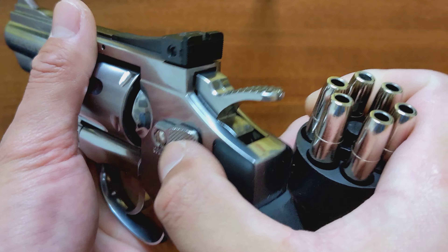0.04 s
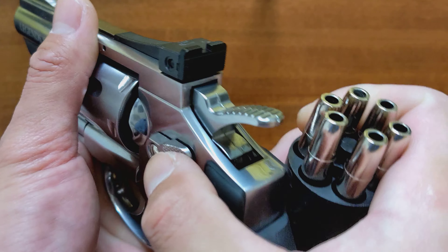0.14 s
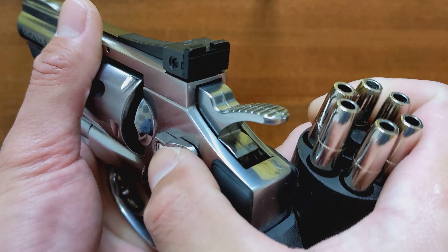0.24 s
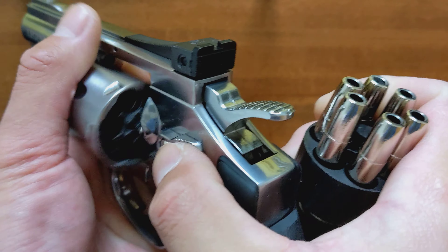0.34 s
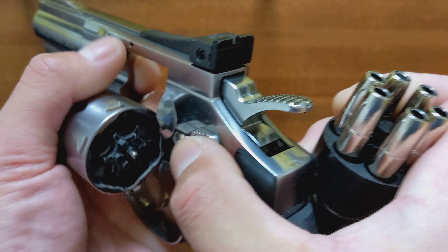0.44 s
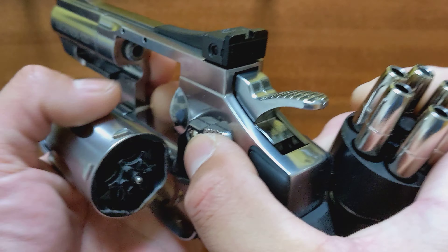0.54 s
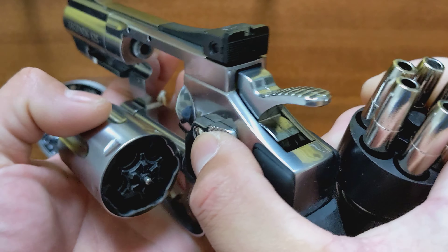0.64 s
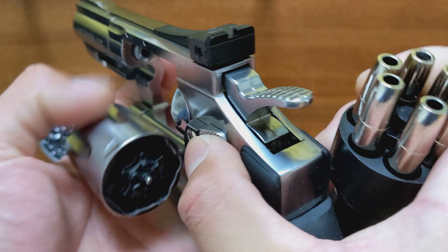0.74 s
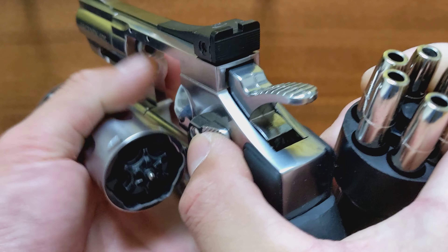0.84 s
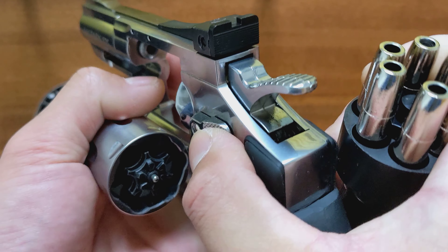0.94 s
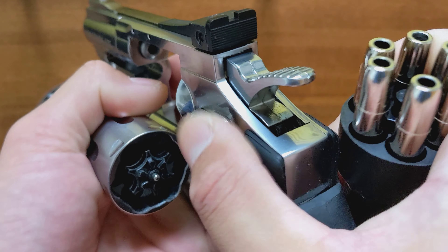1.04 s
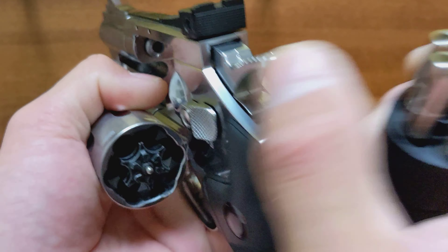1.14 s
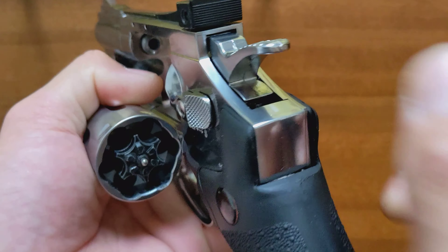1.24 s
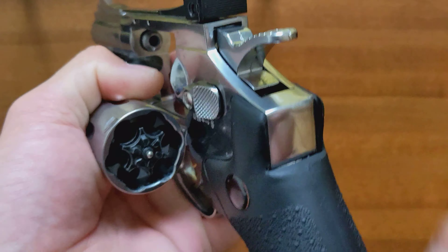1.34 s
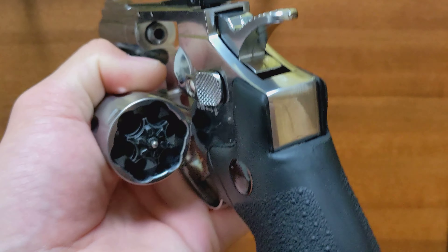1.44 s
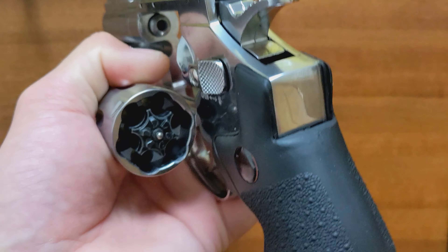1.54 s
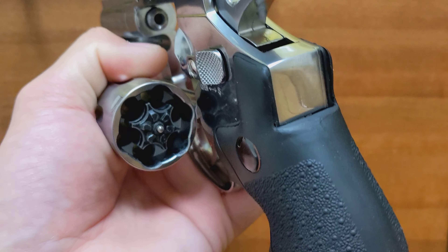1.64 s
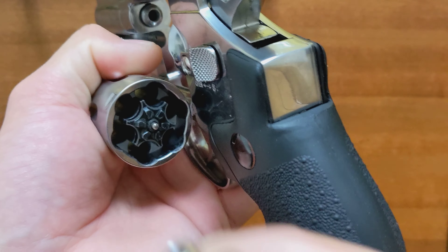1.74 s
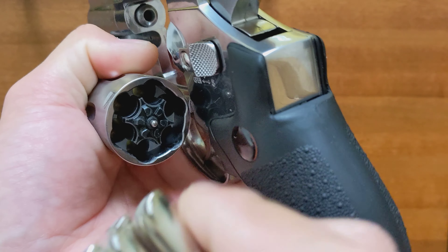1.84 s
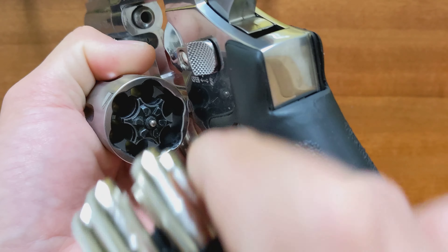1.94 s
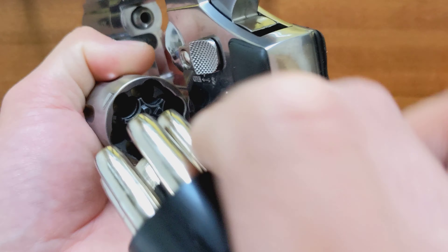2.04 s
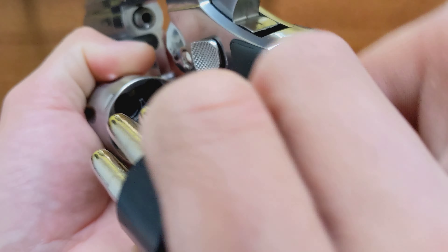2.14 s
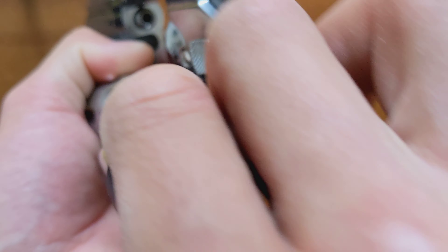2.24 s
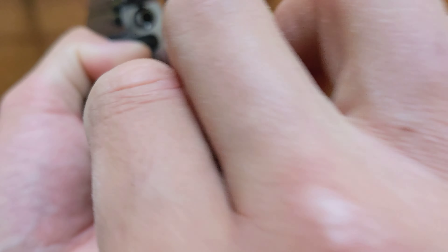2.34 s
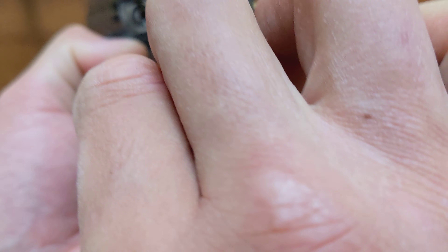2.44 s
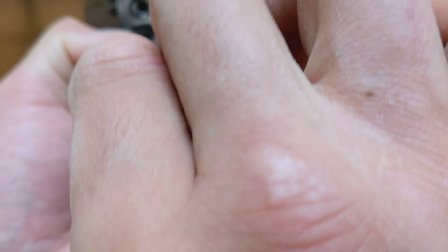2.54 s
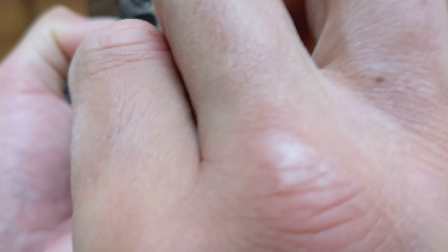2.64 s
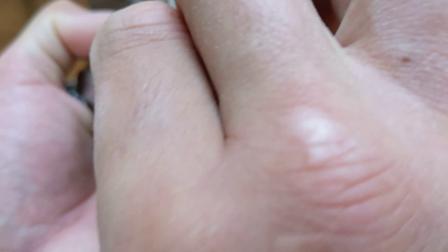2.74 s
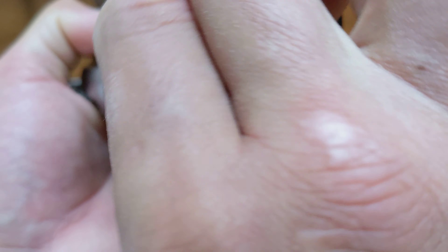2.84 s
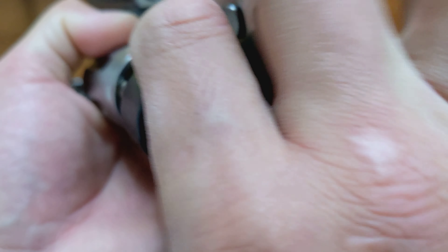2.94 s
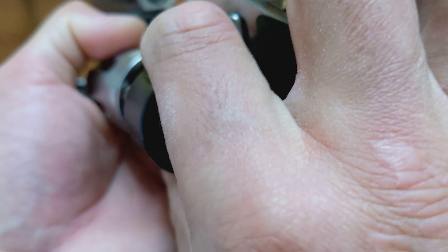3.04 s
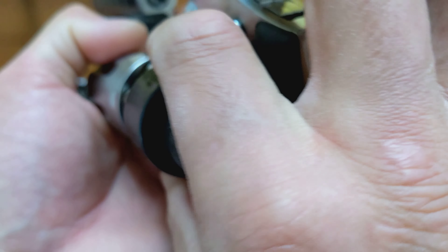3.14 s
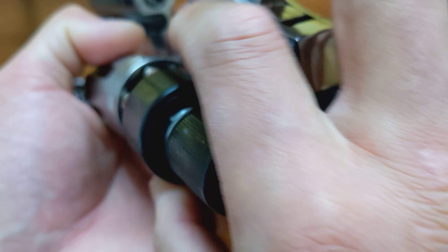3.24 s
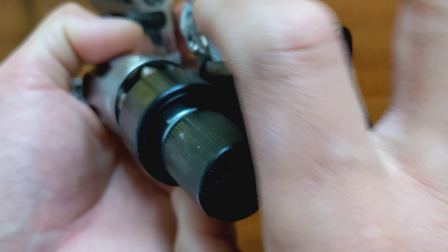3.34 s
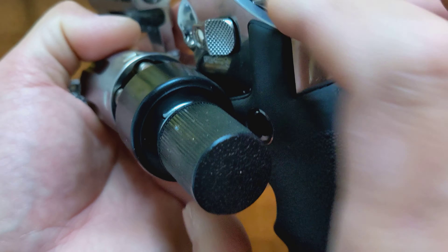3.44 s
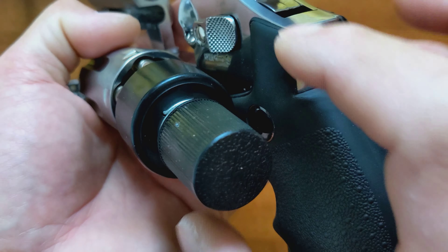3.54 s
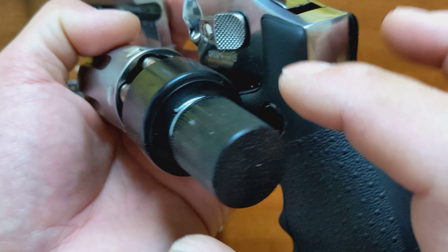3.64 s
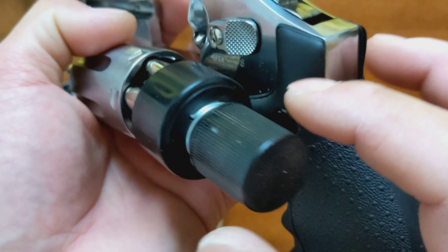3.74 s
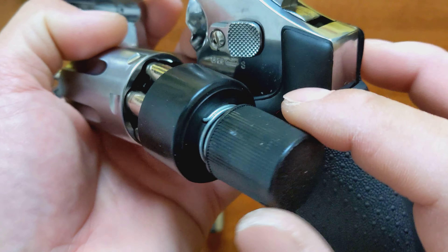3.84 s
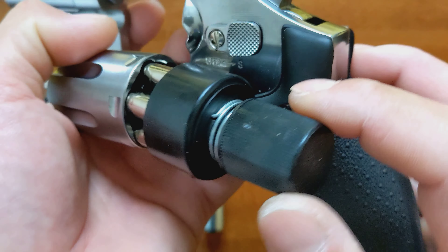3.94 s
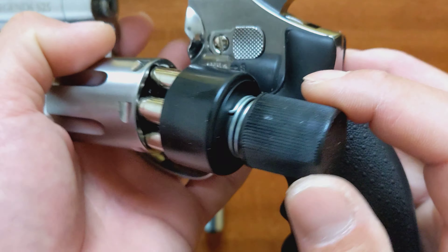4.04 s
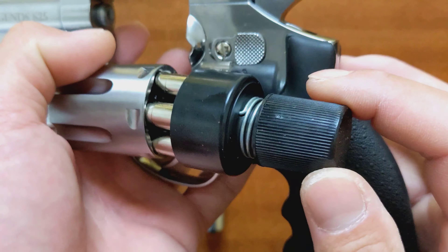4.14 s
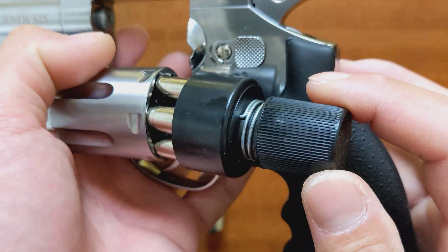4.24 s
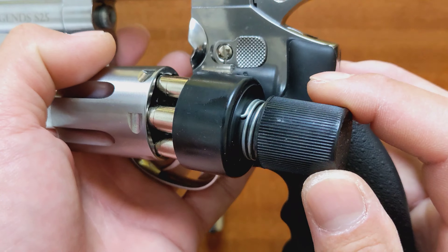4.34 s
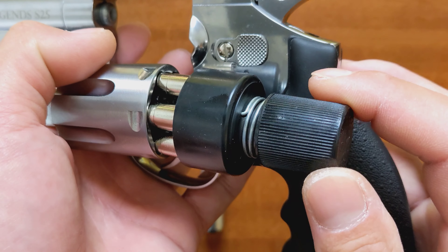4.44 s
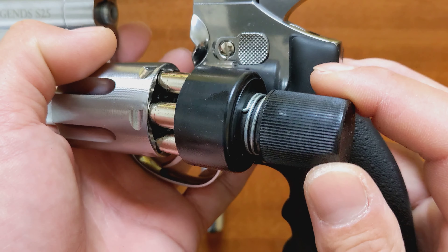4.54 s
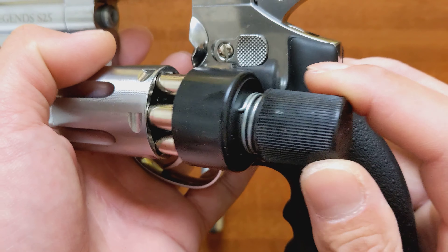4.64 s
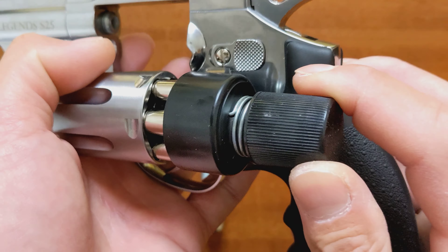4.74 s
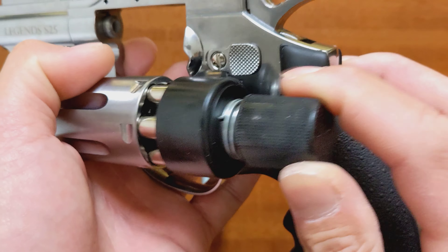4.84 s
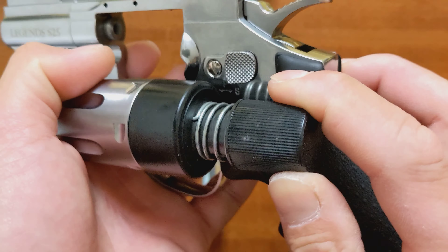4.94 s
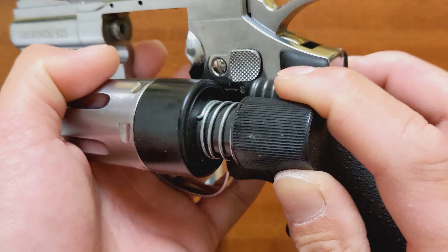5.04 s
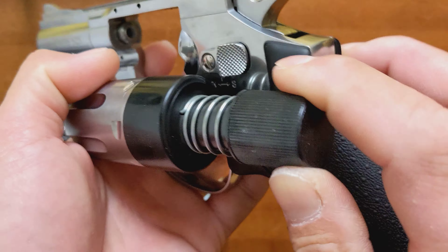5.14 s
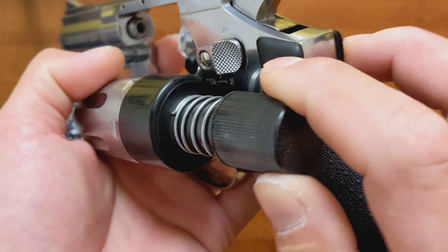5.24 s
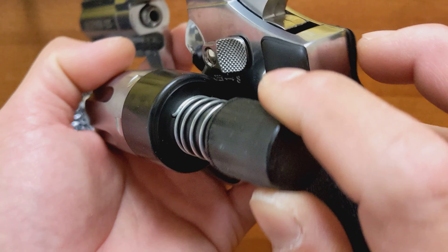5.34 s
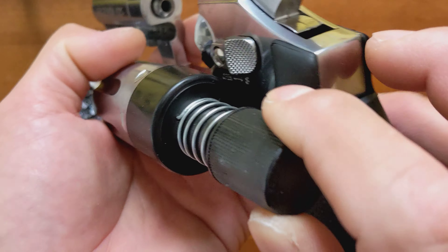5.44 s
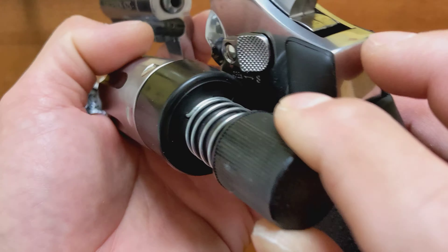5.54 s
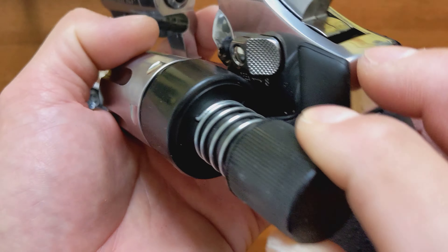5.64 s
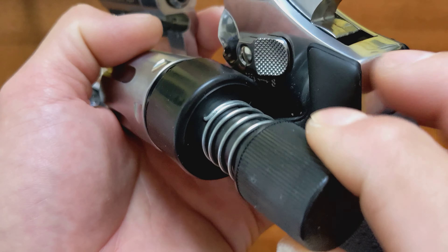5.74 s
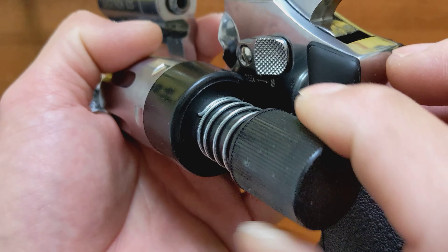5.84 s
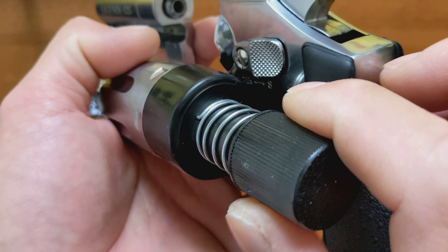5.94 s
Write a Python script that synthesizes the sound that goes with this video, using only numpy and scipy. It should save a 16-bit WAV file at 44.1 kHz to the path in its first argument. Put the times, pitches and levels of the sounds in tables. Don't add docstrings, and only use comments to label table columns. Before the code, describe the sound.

Close stereo microphone in a quiet, damped room. A revolver latch clicks sharply and its cylinder swings out with clacks and a thin high ring. Fingers rub softly, then shells and a plastic loader tick and knock into place. After a pause, a loud cluster of metallic snaps releases the shells, followed by lighter clicks. Faint traffic drone and hiss lie beneath.

```python
import sys
import numpy as np
from scipy import signal
from scipy.fft import rfft, irfft
from scipy.io import wavfile

SR = 44100
rng = np.random.default_rng(int(sys.argv[2]) if len(sys.argv) > 2 else 0)


def store_pcm(level_fs):
    pcm = np.round(np.clip(level_fs, -1, 1) * 32767).astype(np.int16)
    wavfile.write(sys.argv[1], SR, np.atleast_2d(pcm).T)


def nominal_scale(level):
    x = np.asarray(level, float) / 20
    return 10 ** x


N = 264600
TIME_S = np.arange(N) / SR

# (low edge [Hz], high edge [Hz])
BANDS = [
    (1850, 3500),
    (780, 1420),
    (3600, 8000),
    (8700, 16500),
]
# (time [s], left minus right [dB])
PLACE = [(0.0, -4), (1.07, -1.5), (1.1, -6.0), (1.52, -12.0), (1.7, -13.5), (1.74, -1.5), (2.04, -9),
         (2.4, -2.5), (2.5, 1), (3.05, 0.5), (3.44, -2), (4.94, -2.5), (5.58, -3), (5.9, -4.5),
         (5.94, -1.5), (6.0, -1.5)]
# (frequency [Hz], likeness [-1 to 1])
LIKENESS = [(60, .985), (150, .97), (290, .8), (640, .36), (1200, -.2), (2500, 0), (15000, 0)]


def rms_one(x):
    return x / np.sqrt(np.mean(x ** 2) + 1e-20)


def in_time(rows):
    s, *columns = np.transpose(rows)
    return [np.interp(TIME_S, s, column) for column in columns]


def at_hz(points, hz):
    point_hz, value = np.array(points)[:, :2].T
    return np.interp(np.log(hz), np.log(point_hz), value)


def drift(rate_hz):
    r = np.exp(-80 * np.pi * rate_hz / SR)
    noise = rng.standard_normal(N // 40 + 2002)
    slow = signal.lfilter([1], [1, -2 * r, r * r], noise)[2000:]
    return np.interp(np.arange(N) / 40, np.arange(len(slow)), rms_one(slow))


def strikes(times, gains):
    out = np.zeros(np.shape(gains)[:-1] + (N,)) + 1e-18
    out[..., np.minimum((times * SR).astype(int), N - 1)] = gains
    return out


def dying(clicks, t60, rise_s):
    r, q = nominal_scale(-60 / (t60 * SR)), np.exp(-1 / (rise_s * SR))
    return signal.lfilter([1 - q], np.convolve([1, -r], [1, -q]), clicks)


def ring(clicks, hz, t60):
    r, w = nominal_scale(-60 / (t60 * SR)), 2 * np.pi * hz / SR
    return signal.lfilter([0, np.sin(w)], [1, -2 * r * np.cos(w), r * r], clicks)


def resonance(x, hz, width):
    r = np.exp(-np.pi * width / SR)
    poles = [1, -2 * r * np.cos(2 * np.pi * hz / SR), r * r]
    return signal.lfilter((1 - r * r) / 2 * np.array([1, 0, -1]), poles, x)


def coloured(spectrum, likeness):
    hz = np.maximum(np.arange(N // 2 + 1) * SR / N, 1)
    mid, side = rfft(rng.standard_normal((2, N))) * nominal_scale(at_hz(spectrum, hz))
    alike = np.clip(at_hz(likeness, hz), -1, 1)
    return rms_one(irfft(np.sqrt(1 + alike) * mid + np.sqrt(1 - alike) * side * [[1], [-1]], N))


def contacts():
    s, band_db, clack_hz = blows()
    purity = np.clip((band_db[0] - band_db[2] - 6.5) / 11, 0, 1)
    pan_db = np.interp(s, *np.transpose(PLACE))
    out = bursts(s, band_db, purity, pan_db)
    out = out + frame_modes(s, band_db, pan_db) + clacks(s, band_db[0], clack_hz, purity, pan_db)
    thin = signal.sosfilt(signal.butter(5, 740, "high", fs=SR, output="sos"), out)
    return thin + nominal_scale(-18) * out


def blows():
    # (time [s], clack [dB], weight re clack [dB], hardness re clack [dB], clack pitch [Hz])
    steel = [(.3067, -44.5, 2, -9, 1840), (.3636, -25, -1.5, 5, 2270), (.4267, -50, -3, -20, 2000),
             (.4552, -32, 5.5, 12, 1910), (.5766, -35, -5, -3, 2020), (.9534, -28, -2.5, 2.5, 1995),
             (1.222, -44.5, -33, -25, 2400), (1.4854, -44, -14, -23, 2290), (2.763, -34.5, 4, -12, 2000),
             (2.7853, -37.5, 3.5, -18, 2540), (3.022, -38, -5.5, -4, 2500), (3.0287, -28.5, -28, -18, 2600),
             (3.0337, -33, -12, 2, 2870), (3.046, -37.5, 0, -6, 2400), (4.943, -20, -8, -14, 2100),
             (4.952, -18.5, -12, -7, 2100), (4.9615, -26, -16, -10, 2050), (4.9648, -45, -20, 13, 2460),
             (5.007, -24, -9, -1, 2180), (5.0229, -26, -4, -17, 3100), (5.028, -17, -14, 3, 2120),
             (5.587, -36, -2.5, -6, 2650), (5.8784, -22, -18, -15, 2920), (5.9, -36, -6, -10, 2300)]
    # (time [s], clack [dB], weight [dB], hardness [dB], clack pitch [Hz])
    brass = [(.3026, -40, -5.5, -1, 2140), (.317, -47, -8, 4, 1950), (.372, -27, -4, 7.5, 1990),
             (.3879, -33, -4, 0, 3550), (.4328, -40, 5.5, -12, 3280), (.6854, -55.5, 15.5, 18.5, 2220),
             (.6788, -26, -11, -8, 2056), (.9615, -27, -4, 1, 2300), (1.5507, -41, -18, -11.5, 2240),
             (2.5039, -24.5, -8, -2.5, 2420), (2.7917, -43, 0, 0, 2380), (2.9243, -21, -7, -7, 2400),
             (2.986, -37, -11, -2, 2000), (3.4458, -27.5, -8.5, -7.5, 2360), (4.753, -43.5, -3.5, 0, 3040),
             (4.9468, -12, -4, 3.5, 2300), (5.0152, -7, -28, -3, 1973), (5.1887, -24, -22, -8.5, 3350),
             (5.2332, -37, -5, -1.5, 2130), (5.576, -32.5, -8, 1, 3010), (5.8625, -42, -14, -12, 1900),
             (5.8893, -27.5, 0, 9, 2700), (5.9392, -31, 0, 4, 2200), (5.9724, -27, -5.5, -7, 2790)]
    # (time [s], clack [dB], weight [dB], hardness [dB], clack pitch [Hz])
    plastic = [(.3686, -31, -3, 5, 1780), (.8593, -43, 2, -5, 2000), (.9455, -28.5, 0, 1, 2016),
               (1.17, -35.5, -3.5, 2, 2810), (1.572, -44, -15, -18, 2400), (1.5755, -34, -13, -15, 2740),
               (1.589, -42, -8, -4, 2350), (1.608, -33, -17, -15, 2300), (1.6123, -25, -20, -24, 2250),
               (1.6178, -55.5, -20, 22, 2350), (2.0784, -52.5, -7, 13, 2300), (2.1166, -38, -13, 1, 2920),
               (2.7413, -32.5, -6, -10, 2680), (2.75, -43, -4.5, -4, 2550), (2.7541, -40, -7, 9, 2303),
               (2.7685, -26.5, 0, 1, 2800), (2.991, -41, -3, 3, 2260), (3.0102, -16.5, -15, -13, 3005),
               (4.9728, -27.5, -14, 1, 2330), (5.0105, -17, -14, -13, 2170), (5.2087, -40, -32, 2, 2640),
               (5.6244, -40, -7, -4, 2270), (5.846, -47, -.5, 6.5, 2670), (5.8668, -38, -10, -2, 2270)]
    # (time [s], clack [dB], weight [dB], hardness [dB])
    ticks = [(.0816, -56, -3, -5), (.5908, -42.5, 1, -12), (.6238, -51.5, 6.5, -7), (.6585, -56, -8, -16),
             (1.1456, -60, -14, -8), (1.443, -60, -9, -14), (1.5258, -61, -24, -5), (1.777, -66, -7, 5),
             (2.0007, -48, -25, -11), (2.0739, -48, 4.5, 4), (2.139, -58, -7.5, -5),
             (2.1545, -52.5, -15, 2), (2.1607, -58, 17, -18), (2.1856, -61, 13.5, -22),
             (2.426, -53, -19, 4), (3.078, -52, 0, -14), (2.8156, -55, 4, -2), (2.824, -54.5, 14, -10),
             (2.898, -55, 8, -28), (2.9138, -55.5, 9, 2), (2.9487, -46, -4, -8), (2.973, -45, -3, -7),
             (3.2763, -55.5, -17, -10), (3.361, -55, -19.5, -6), (3.4704, -51, -14, -17),
             (3.4928, -57, -8.5, -22), (4.861, -49.5, 6.5, -20), (5.8355, -60, 2, -3),
             (5.9567, -40, -11, -19), (5.985, -47, -4, -4), (5.9685, -45, -8, 4), (5.948, -38, -8, 4),
             (5.8915, -40, -4, 6), (5.1915, -42, -22, -8), (2.766, -39, -8, 3), (2.7725, -39, -8, 3),
             (2.931, -42, -12, 3), (.3655, -38, -3, 5), (.3775, -39, 0, 2), (5.04, -33, -12, 3),
             (5.0335, -34, -14, 7)]
    sparkle_db = [6, -4, -12, -4.5]
    one_pitch = [(*row, 2330) for row in ticks]
    kinds = [steel, brass, plastic, one_pitch]
    s, clack, weight, hard, clack_hz = np.transpose([row for kind in kinds for row in kind])
    sparkle = hard + np.repeat(sparkle_db, [len(kind) for kind in kinds])
    return s, clack + np.array([0 * s, weight, hard, sparkle]), clack_hz


def bursts(s, band_db, purity, pan_db):
    room_t60_s = [0.12, 0.22, 0.11, 0.06]
    late_t60_s = [.12, .22, .13, .12]
    shared_part = [.9, .93, .7, .55]
    left_lag = [4, 7, 5, 5]
    follows = [1, .3, 1, .8]
    # (frequency [Hz], width [Hz], level [dB])
    humps = [(894, 160, 4), (2300, 140, -2.5), (3100, 330, -9.5), (6673, 260, -6.5), (14900, 2200, -3)]

    noise_db = band_db - np.outer([7.0, 2, -4, 0], purity)
    hardness_db = .5 * np.clip(band_db[3] - band_db[0] - 3.5, 0, 16)
    chatter = rms_one(nominal_scale(5.5 * drift(260)))
    out = np.zeros((2, N))
    per_band = zip(noise_db, BANDS, room_t60_s, late_t60_s, shared_part, left_lag, follows)
    for db, edges, t60, late, share, lag, follow in per_band:
        sides = (follow * pan_db - 2.5 * (1 - follow)) * [[.5], [-.5]]
        here = db + sides
        shared = rng.standard_normal(N)
        own, wash = rng.standard_normal((2, 2, N))
        both = share * np.array([np.roll(shared, lag), shared])
        both = both + np.sqrt(1 - share ** 2) * own

        snap = dying(strikes(s, nominal_scale(here + 5)), t60=0.0042, rise_s=0.0005)
        crunch = chatter * dying(strikes(s, nominal_scale(here - 7.5)), t60=0.027, rise_s=0.0011)
        closing = strikes(s, nominal_scale(here - 21 - 1.5 * hardness_db))[:, ::-1]
        scrape = dying(closing, t60=0.011, rise_s=0.00014)[:, ::-1]
        pulse = strikes(s, nominal_scale(here + 3 + 1.4 * hardness_db))
        echoes = dying(strikes(s, nominal_scale(2 * (db + .4 * sides - 17.5))), t60=t60 / 2, rise_s=.003)
        echoes += dying(strikes(s, nominal_scale(2 * (db - 37.5))), t60=late, rise_s=.006)

        burst = (snap + crunch + scrape) * both + pulse + np.sqrt(np.abs(echoes)) * wash
        band = signal.butter(3, edges, "band", fs=SR, output="sos")
        out += np.sqrt(SR / 2 / (edges[1] - edges[0])) * signal.sosfilt(band, burst)
    return nominal_scale(-3.5) * (out + sum(nominal_scale(db) * resonance(out, hz, width) for hz, width, db in humps))


def frame_modes(s, band_db, pan_db):
    # (frequency [Hz], level [dB], t60 [s])
    modes = [(916, -4.5, .04), (1043, 0, 0.07), (1362, -8, .04), (1987, -10, .05), (2350, -13, .08),
             (2728, -8, 0.047), (3173, -8.5, .04), (4340, -15, 0.038), (6100, -8, .015), (7085, -2.5, .025),
             (10060, -10.5, .015), (12700, -13.5, .02), (14200, -8.5, 0.013)]
    sides = np.array([pan_db, -pan_db]) / 2
    luck = rng.standard_normal((len(s), len(modes), 4))
    out = np.zeros((2, N))
    for k, (hz, mode_db, t60) in enumerate(modes):
        db = band_db[[low <= hz < high for low, high in BANDS].index(True)]
        node_db = 1.2 * luck[:, k, 0]
        strength = nominal_scale(db + mode_db - 7 + node_db + sides * min(hz / 2000, 1) ** 2)
        flip = np.sign(luck[:, k, 3] + .8 + 9 * (hz < 1500))
        beam = nominal_scale(2.5 * luck[:, k, 1:3].T) * [np.ones(len(s)), flip]
        out += ring(strikes(s, strength * beam), hz, t60)
    return out


def clacks(s, clack_db, clack_hz, purity, pan_db):
    t = np.arange(4000) / SR
    shape = (1 - np.exp(-t / .0011)) * (nominal_scale(-60 * t / 0.02) + nominal_scale(-14.5 - 60 * t / 0.065))
    sides = np.array([pan_db, -pan_db]) / 2
    gains = nominal_scale(clack_db + 1.2 * purity + sides - 4.5).T
    out = np.zeros((2, N))
    for at, hz, gain, phase in zip((s * SR).astype(int), clack_hz, gains, rng.random((len(s), 2))):
        pair = np.sin(2 * np.pi * hz * t + phase[:, None])
        pair += .4 * np.sin(2 * np.pi * 1.05 * hz * t + 6 * phase[::-1, None])
        out[:, at:at + len(t)] += (gain[:, None] * shape * pair)[:, :N - at]
    return out


def pings():
    # (time [s], peak [dB], frequency [Hz], left minus right [dB])
    short_tones = [(.3645, -25, 7235, -2), (.3645, -30, 5512, -6), (.372, -31, 5340, -5), (.3725, -27, 6976, -6),
                   (.3725, -30, 3962, -10), (.376, -31, 947, -2), (.3825, -37, 3273, -7), (.4555, -23, 9819, -9),
                   (.4555, -27, 12403, 10), (.577, -43, 9130, -12), (.6795, -48, 9043, -12),
                   (.685, -46, 14125, -10), (.954, -27, 14470, 9), (.961, -29, 1981, -10),
                   (1.589, -42, 7100, -10), (1.6165, -36, 7149, -14), (2.0003, -47, 2325, -7),
                   (2.505, -36, 5426, -2), (2.506, -38, 15676, 12), (2.754, -38, 6459, 10), (2.755, -38, 5598, 9),
                   (2.768, -35, 5512, -6), (2.769, -28, 947, -4), (2.8235, -43, 1033, -3),
                   (3.011, -36, 5340, -10), (3.022, -35, 2497, 0), (3.443, -46, 5512, 1), (4.9465, -23, 9474, 7),
                   (4.947, -27, 13522, -4), (4.947, -21, 890, -3), (4.9485, -28, 3300, -2),
                   (4.9505, -26, 14900, 6), (4.9655, -27, 13953, 8), (5.008, -26, 13522, -6),
                   (5.0155, -26, 10766, -5), (5.0275, -27, 900, -3), (5.0293, -26, 8354, -1),
                   (5.0288, -19, 14470, -3), (5.029, -28, 4450, -2), (5.5805, -43, 8268, -4),
                   (5.585, -47, 6029, -10), (5.88, -40, 6201, -10), (5.882, -43, 8354, -6),
                   (5.939, -42, 8182, -10), (5.9403, -34, 13436, -8), (5.9473, -44, 5254, -10),
                   (5.9493, -40, 13695, -3), (5.9707, -44, 13522, -6), (1.6128, -29, 2800, -13),
                   (5.0155, -13, 2060, -1)]
    out, t = np.zeros((2, N)), np.arange(1500) / SR
    shape = (1 - np.exp(-t / .0008)) ** 2 * nominal_scale(8.5 - 60 * t / .016)   # rise, t60 in s
    for (s, db, hz, pan_db), phase in zip(short_tones, 2 * np.pi * rng.random((len(short_tones), 2))):
        turn = 2 * np.pi * hz * (t - np.array([[6], [0]]) / SR)
        pair = np.sin(turn + phase[0]) + .45 * np.sin(turn + 2 * np.pi * 260 * t + phase[1])
        gain = nominal_scale(db + pan_db / 2 * np.array([[1], [-1]]))
        at = int(s * SR) - 30
        out[:, at:at + len(t)] += (gain * shape * pair)[:, :N - at]
    return out


def cylinder():
    # (time [s], peak [dB], frequency [Hz], t60 [s])
    sings = [(.388, -33, 12570, .035), (.456, -42, 12530, .13), (.578, -41, 12550, .11),
             (.685, -43, 12550, .11), (.956, -37, 12550, .13), (.9625, -36, 12520, .12),
             (.969, -34, 12520, .12), (.957, -38, 14480, .07), (2.505, -47, 12600, .06),
             (2.742, -49, 12600, .04), (2.815, -59, 15750, .08), (2.986, -46, 12750, .04),
             (3.015, -38, 12750, .05), (3.034, -33, 12800, .05), (3.06, -55, 12800, .08),
             (4.752, -50, 12750, .05)]
    rings = 0
    for s, db, hz, t60 in sings:
        blow = strikes(np.array([s]), [nominal_scale(db)])
        rings = rings + ring(blow, hz, t60) + 0.24 * ring(blow, hz + 37, t60)
    return rings * nominal_scale([[.5], [-.5]])


def rubbing():
    # (time of peak [s], peak [dB], swell by 20 dB [s], fade by 20 dB [s])
    strokes = [(.16, -63, .15, .11), (.29, -67.5, .1, .03), (1.2, -63, .16, .09), (1.8, -73, .12, .08),
               (1.875, -60, .015, .1), (1.92, -63, .04, .06), (2.02, -65, .04, .02), (1.99, -57, .04, .09),
               (2.13, -54, .05, .06), (4.75, -58, .055, .05), (4.945, -48, .012, .03),
               (5.182, -45, .06, .04), (5.255, -59, .04, .03), (5.5, -60, .08, .11), (5.86, -53, .1, .03)]
    # (frequency [Hz], level per Hz [dB])
    rub = [(470, -43.5), (800, -18), (1030, 3.5), (1850, -26.5), (2290, -12.5), (2500, -15.5),
           (4150, -19.5), (8220, -17), (9450, -24.5), (12200, -18), (15100, -15.5), (15900, -26),
           (16500, -43)]
    # (start [s], end [s])
    brush_s = (1.75, 2.09)
    level = 0
    for s, db, swell, fade in strokes:
        level = level + nominal_scale(db - 20 * np.maximum((s - TIME_S) / swell, (TIME_S - s) / fade))
    pan_db, = in_time(PLACE)
    noise = coloured(rub, [(800, .3), (8000, .1)])
    patches = sum(nominal_scale(2.5 + 4 * drift(9)) * resonance(noise, hz, .05 * hz)
                  for hz in (2300, 3166, 5165, 8250, 11800, 14360))
    bright = rms_one(noise + patches)
    dull = signal.sosfilt(signal.butter(1, 5000, fs=SR, output="sos"), bright)
    brushing = (TIME_S > brush_s[0]) & (TIME_S < brush_s[1])
    grain = nominal_scale(3.5 * drift(70) + 2.5 * drift(400))
    return level * grain * nominal_scale(0.44 * pan_db * [[1], [-1]]) * np.where(brushing, bright, 1.2 * dull)


def far_engine():
    # (time [s], frequency [Hz], level [dB])
    engine = [(0.0, 58.3, -63.5), (1.59, 60.3, -62.5), (2.01, 61.5, -71), (2.1, 60.0, -58), (2.24, 58, -57),
              (2.58, 59.8, -69), (2.83, 60.0, -64), (3.38, 62.1, -71), (3.7, 56.2, -84)]
    # (multiple [1], level [dB])
    engine_orders = [(2, -14), (3, -12), (3.63, -12), (8, -23)]
    hz, db = in_time(engine)
    turn = 2 * np.pi * np.cumsum(hz) / SR
    gone = np.clip((engine[-1][0] - TIME_S) / 0.22, 0, 1)
    load = np.interp(TIME_S, [.4, .9, 2.0, 2.6], nominal_scale(np.array([-10.0, 3.0, 2.0, -6.0])))
    orders = load * sum(nominal_scale(d - 66.5 + 5.3 * drift(0.72)) * np.sin(k * turn) for k, d in engine_orders)
    return np.sqrt(2) * gone * (nominal_scale(db) * np.sin(turn) + orders) * nominal_scale([[-.6], [.6]])


def traffic():
    # (frequency [Hz], level per Hz [dB])
    drone = [(15, -56), (25, -32.5), (43, -7.5), (157, -8), (223, -10), (248, -25.5), (335, -16.5),
             (437, -20), (530, -13.5), (569, -25), (679, -12), (869, -8), (966, -9.5), (1400, -12),
             (1700, -37), (2210, -62.5), (3740, -120)]
    # (time [s], level [dB])
    drone_db = [(0.0, -63.5), (0.6, -61.5), (1.0, -57.5), (1.44, -64.5), (2.12, -57), (2.27, -61),
                (2.79, -63.5), (2.91, -64), (3.11, -62.5), (3.89, -59), (4.24, -63), (4.58, -65),
                (5.88, -60), (6.0, -59)]
    level_db, = in_time(drone_db)
    return nominal_scale(level_db - 1) * coloured(drone, LIKENESS)


def room_booms():
    # (frequency [Hz], width [Hz], level [dB])
    booms = [(56, 6.8, -87.5), (99.6, 9, -73), (149, 8, -73.5), (167, 5, -74), (212.6, 5, -75),
             (640, 24, -76)]
    out = sum(nominal_scale(db) * rms_one(resonance(rng.standard_normal(N), hz, width)) for hz, width, db in booms)
    return out * nominal_scale([[-.6], [.6]])


def microphone_hiss():
    # (frequency [Hz], level per Hz [dB])
    hiss = [(880, -31), (1500, -8.5), (1870, -7), (2140, -9.5), (3030, -8), (3480, -12), (7100, -13.5),
            (10900, -20.5), (13100, -14.5), (16000, -21.5)]
    return nominal_scale(-76 + 3) * coloured(hiss, LIKENESS)


def scene():
    gun = contacts() + pings() + cylinder() + rubbing()
    return gun + far_engine() + traffic() + room_booms() + microphone_hiss()


def top_cut(x):
    return signal.sosfilt(signal.butter(12, 17140, fs=SR, output="sos"), x)


def record(dry):
    rumble = signal.butter(3, 43, "high", fs=SR, output="sos")
    top = signal.ellip(7, .5, 28, 15800, fs=SR, output="sos")
    mix = np.tanh(signal.sosfilt(top, signal.sosfilt(rumble, dry)))
    return top_cut(mix)


dry = scene()
out = record(dry)
store_pcm(out)
```